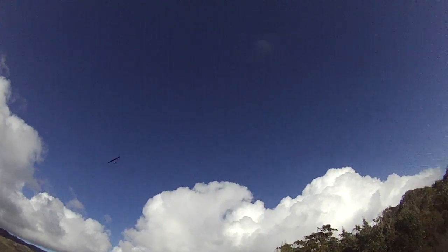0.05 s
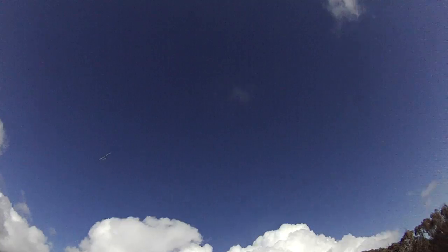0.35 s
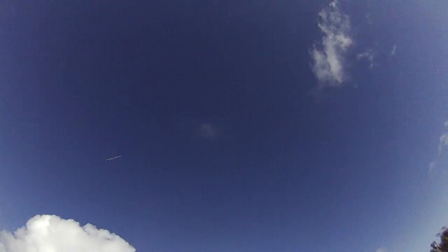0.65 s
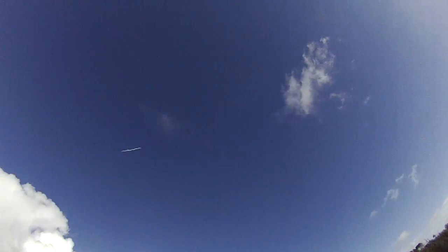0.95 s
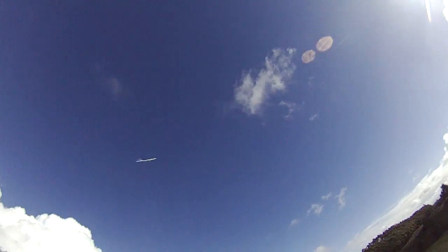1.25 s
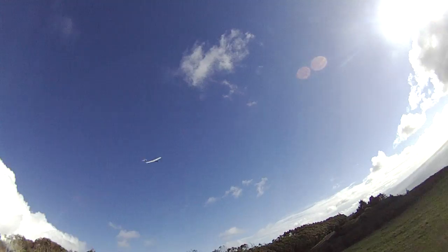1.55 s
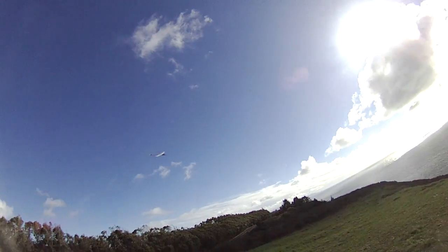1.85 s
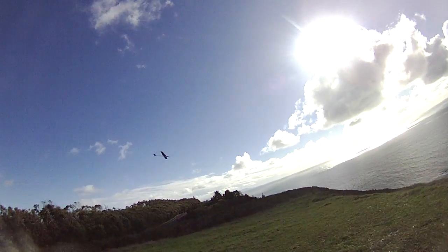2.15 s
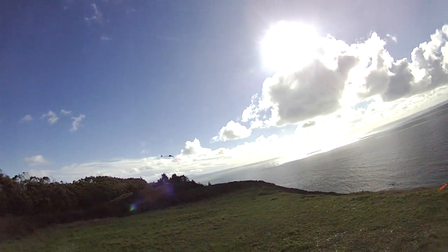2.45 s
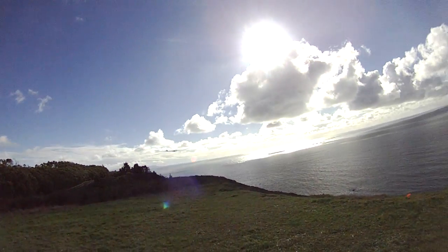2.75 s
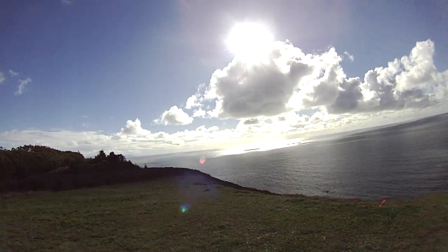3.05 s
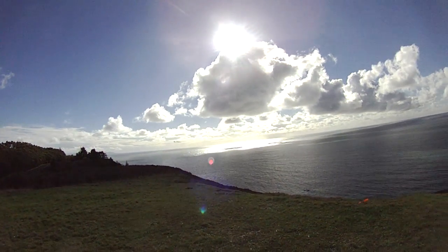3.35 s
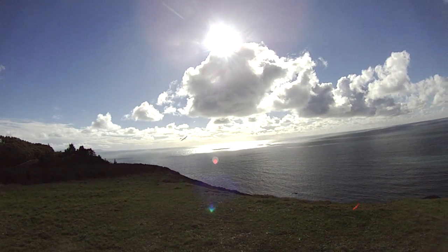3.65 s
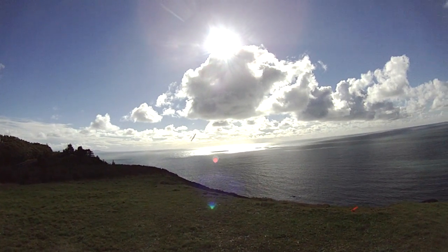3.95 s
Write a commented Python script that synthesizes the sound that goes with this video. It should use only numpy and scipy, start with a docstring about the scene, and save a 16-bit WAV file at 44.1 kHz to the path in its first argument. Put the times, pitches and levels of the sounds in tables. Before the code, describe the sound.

Strong wind buffets and roars on the microphone from the start, with a wavering whistle until about 0.7 seconds and hard gusts around 1 second. Near 1.7 seconds it drops to a gentle breeze, bumping softly over faint distant surf and thin grass hiss. A light tick comes near 2.9 seconds. The puffs pick up again around 3.8 seconds, where the sound cuts out for an instant.

```python
"""A grassy slope above the sea, a small microphone out in strong wind. Eddies buffet its port, and
the air rushes over the housing and whistles on an edge. The microphone turns out of the wind; then
soft eddies bump against it, over distant surf and a thin hiss and rustle of grass.
The housing ticks now and then, and near the end the sound drops out for an instant."""
import sys
import numpy as np
from scipy import signal
from scipy.fft import rfft, irfft
from scipy.io import wavfile
from scipy.ndimage import uniform_filter1d

SR = 44100
rng = np.random.default_rng(int(sys.argv[2]) if len(sys.argv) > 2 else 0)


def transcribe(u):
    """Save the signal u as a 16-bit wav file named by the first command-line argument.

    u: samples, shape (n,) or (channels, n), limited to [-1, 1]; the rate is SR.
    q: integer samples, one column per channel.
    """
    v = np.clip(np.atleast_2d(u).T, -1, 1)
    q = np.round(v * 32767).astype(np.int16)
    wavfile.write(sys.argv[1], SR, q)


N = 176400
TIME = np.arange(N) / SR
CALM_FROM_S, CALM_BY_S = 1.41, 1.717  # the microphone turns into its own lee

# Air on the microphone: buffeting at the port, roar across the housing, rasp off its corners,
# hiss in its slits: t/s, relative level/dB
BUFFET_LEVEL = [(0.0, -30.5), (0.03, -31.5), (0.1, -35.5), (0.12, -36), (0.2, -35.5), (0.23, -29),
                (0.36, -30.5), (0.4, -27), (0.57, -33), (0.59, -30.5), (1.04, -26.5), (1.28, -32.5),
                (1.36, -25), (1.39, -32), (1.54, -34.5), (1.56, -40.5), (1.67, -33), (1.73, -49),
                (1.78, -55), (1.82, -44), (1.87, -62), (2.41, -58.5), (2.44, -44.5), (2.53, -55),
                (2.55, -70), (2.71, -63.5), (2.84, -42.5), (2.87, -51.5), (2.95, -39.5), (3.0, -52),
                (3.06, -45.5), (3.13, -53.5), (3.21, -42.5), (3.26, -50), (3.41, -43.5), (3.42, -49),
                (3.73, -51), (3.77, -38.5), (3.82, -39.5), (3.88, -43.5), (4.0, -41.5)]
ROAR_LEVEL = [(0, -45), (.11, -41.5), (.18, -48), (.39, -38.5), (.6, -40), (.7, -37.5), (1.0, -35.5),
              (1.08, -38.5), (1.22, -40.5), (1.38, -38), (1.54, -40), (1.565, -51.5), (1.6, -51),
              (1.676, -42), (1.69, -66), (1.73, -62.5), (1.75, -58.5), (1.77, -97), (1.792, -45.5),
              (1.81, -104), (1.9, -68)]
RASP_LEVEL = [(0, -46.5), (.12, -44.5), (.18, -53.5), (.3, -52), (.4, -49.5), (.6, -53), (.75, -59.5),
              (.82, -41.5), (.87, -49.5), (1.02, -42.5), (1.07, -44), (1.12, -38.5), (1.17, -52.5),
              (1.33, -48), (1.43, -45), (1.5, -41.5), (1.54, -61), (1.57, -62), (1.675, -49), (1.69, -64),
              (1.85, -98)]
SLIT_HISS_LEVEL = [(.2, -89.5), (.95, -86), (1.08, -78.5), (1.125, -68.5), (1.16, -76.5), (1.23, -86),
                   (1.3, -77.5), (1.45, -88.5), (1.55, -98), (1.7, -100)]
# The surroundings: far surf, breeze in the grass, dry stems: t/s, level/dB
SURF_LEVEL = [(0, -65.5), (1.9, -62.5), (2.2, -58.5), (2.7, -58.5), (3.4, -57), (4, -57)]
GRASS_LEVEL = [(0, -76), (1.5, -80.5), (1.95, -79), (2.05, -77), (2.4, -74.5), (2.8, -73), (3.1, -74),
               (3.25, -71.5), (3.55, -72.5), (3.7, -68), (4, -70)]
STEM_LEVEL = [(3.1, -95), (3.24, -79), (3.45, -76.5), (3.56, -77), (3.7, -95)]
# Spectra of the noises at the microphone: f/Hz, relative density/dB
WINDWARD_SPECTRUM = [(25, -25.5), (60, -22), (110, -9.5), (170, -4), (260, 0), (380, 0), (600, -7),
                     (900, -21.5), (1500, -28.5), (3000, -73), (12000, -92.5)]
LEE_SPECTRUM = [(25, -9), (60, -4.5), (130, -2.5), (240, -2), (400, -9.5), (600, -15), (1000, -28),
                (2000, -36.5), (4000, -65), (12000, -83)]
ROAR_SPECTRUM = [(200, -15.5), (400, -3), (600, 5), (950, 0), (1500, -4.5), (2000, -14.5), (2550, -27),
                 (3100, -37.5), (3900, -44.5), (5200, -47), (7000, -55), (12000, -84.5)]
RASP_SPECTRUM = [(1000, -4), (1500, -2), (2000, 3), (2600, -9), (2900, -16.5), (3300, -25.5), (4200, -38),
                 (6000, -53), (12000, -81)]
SURF_SPECTRUM = [(30, 3), (120, -1), (250, 6), (400, -6), (700, 2), (1100, 0.5), (1550, -5.5),
                 (2000, -15.5), (2500, -29.5), (5000, -35.5)]
GRASS_SPECTRUM = [(1000, -1), (2200, -1), (3200, -0.5), (5000, -5), (7000, -10.5), (10000, -12),
                  (15000, -17)]
FLAP_SPECTRUM = [(100, -7), (300, 4.5), (700, 12), (1300, 4), (2100, -8.5), (2700, -10.5), (3300, -35.5),
                 (5000, -49), (12000, -94)]
RUSTLE_SPECTRUM = [(3000, -23), (5000, -1), (6400, 0), (7000, -10), (8000, 0), (9000, -20), (14000, -23)]
SNAP_SPECTRUM = [(1200, -25), (2000, -2), (3000, -1), (4300, -4), (6200, -4), (7500, -18), (13000, -30)]
# Likeness of left and right in the grass hiss: f/Hz, correlation/0-1
GRASS_CORRELATION = [(2000, 0.92), (4500, 0.8), (8000, 0.3), (13000, .75)]
# Single eddies on the port: t/s, peak level/dB, centre f/Hz
EDDIES = [(0.123, -18, 314), (.149, -19.5, 278), (.246, -15, 390), (0.972, -15.5, 422), (1.019, -17, 400),
          (1.046, -18, 520), (1.118, -19, 370), (1.502, -24, 420), (1.527, -24, 350), (1.674, -23, 330),
          (1.793, -54, 895), (1.818, -32.5, 243), (1.922, -47.5, 280), (1.979, -40.5, 159),
          (2.003, -45, 146), (2.188, -44.5, 320), (2.254, -45, 260), (2.361, -47.5, 240), (2.454, -43, 556),
          (2.461, -38, 264), (2.526, -38.5, 257), (2.836, -35.5, 534), (2.908, -31, 288), (2.923, -33, 430),
          (2.944, -37, 254), (2.955, -25, 257), (3.038, -36.5, 136), (3.063, -36, 167), (3.222, -38.5, 170),
          (3.397, -31.5, 220), (3.527, -36, 197), (3.768, -25, 253), (3.775, -38, 380), (3.8, -29, 258),
          (3.806, -28.5, 490), (3.819, -28.5, 260), (3.837, -33, 192), (3.854, -32.5, 230),
          (3.898, -35, 200), (3.917, -27.5, 427), (3.953, -30, 210), (3.981, -37, 180)]
# Edge tone of the housing, in two registers: t/s, f/Hz, relative level/dB
LOW_EDGE_TONE = [(.13, 1500, -48), (.19, 1520, -44), (.205, 1560, -33), (.218, 1600, -30.5),
                 (.229, 1440, -36), (.238, 1510, -34), (.25, 1470, -36), (.273, 1680, -31),
                 (.29, 1620, -60), (.303, 1630, -31), (.316, 1590, -31), (.328, 1390, -36),
                 (.343, 1530, -42), (.355, 1900, -29), (.369, 1650, -45), (.38, 1552, -35),
                 (.41, 1680, -39), (.44, 1440, -35), (.47, 1550, -33), (.495, 1560, -39), (.52, 1520, -35),
                 (.545, 1380, -42), (.585, 1290, -35.5), (.62, 1350, -48), (.645, 1460, -35),
                 (.662, 1550, -36), (.69, 1500, -60)]
HIGH_EDGE_TONE = [(.345, 2620, -73), (.362, 2446, -37), (.376, 2147, -50), (.392, 2340, -37),
                  (.406, 2610, -38.5), (.413, 2385, -36), (.429, 2170, -44), (.44, 2150, -67)]
# Instants when the flow tears loose: t/s, level/dB
FLAP_BURSTS = [(.145, -29.5), (0.82, -33.5), (1.199, -37), (1.372, -38), (1.498, -48), (1.531, -32.5),
               (1.544, -33), (1.586, -39), (1.611, -37), (1.663, -35), (1.677, -37.5), (1.705, -44.5),
               (1.751, -60), (3.77, -41.5), (3.805, -45), (3.926, -62), (3.97, -58), (3.987, -43)]
# Spits of the gusts and dry rustles in the lee: t/s, half-length/s, level/dB
SPIT_BURSTS = [(.818, .014, -68), (.97, .09, -75), (1.374, .008, -69), (1.495, .012, -71)]
RUSTLE_BURSTS = [(2.044, .035, -80), (2.213, 0.044, -81), (3.675, .04, -84), (3.744, 0.005, -65)]
# Resonances of the slits: f/Hz, width/Hz, relative level/dB
SLIT_RESONANCES = [(5220, 580, -2.5), (6170, 900, -4)]
# Light contacts on the housing: t/s, relative level/dB
CONTACTS = [(2.238, -62), (2.677, -56), (2.8755, -40), (2.8838, -45.5), (3.743, -58)]
# Modes of the housing: f/Hz, relative level/dB, T60/s
HOUSING_MODES = [(2030, -2.5, .022), (2400, -5.5, .011), (2900, -7, .009)]


def from_db(db):
    """Decibels to gain."""
    return 10 ** (np.asarray(db) / 20)


def unit_rms(x):
    """Scale to rms 1."""
    return x / np.sqrt(np.mean(x ** 2) + 1e-20)


def in_time(rows, column=1):
    """One column of a curve at every sample."""
    rows = np.array(rows)
    return np.interp(TIME, rows[:, 0], rows[:, column])


def per_bin(points):
    """Read a curve at every FFT bin, on a log-frequency axis."""
    points = np.array(points)
    hz = np.fft.rfftfreq(N, 1 / SR)
    return np.interp(np.log(hz + 1), np.log(points[:, 0]), points[:, 1])


def drift(rate_hz):
    """Smooth random wander with a spread near 1, its extremes rounded off."""
    step, settle = 10, 4000
    pole = np.exp(-2 * np.pi * rate_hz * step / SR)
    noise = rng.standard_normal(N // step + settle + 2)
    slow = unit_rms(signal.lfilter([1], [1, -2 * pole, pole * pole], noise)[settle:])
    wander = np.interp(np.arange(N) / step, np.arange(len(slow)), slow)
    return 2.5 * np.tanh(wander / 2.5)


def coloured(x, spectrum):
    """Give a signal a spectrum, rolled off below 20 Hz; rms 1."""
    hz = np.fft.rfftfreq(N, 1 / SR)
    gain = from_db(per_bin(spectrum)) * hz / np.hypot(hz, 20)
    return unit_rms(irfft(rfft(x) * gain, N))


def resonant(x, hz, width_hz):
    """Pass twice through a two-pole band-pass; rms 1."""
    r = np.exp(-np.pi * width_hz / SR)
    b, a = [1 - r, 0, r - 1], [1, -2 * r * np.cos(2 * np.pi * hz / SR), r * r]
    return unit_rms(signal.lfilter(b, a, signal.lfilter(b, a, x)))


def swells(rows):
    """An envelope of bell-shaped bursts."""
    return sum(from_db(db) * np.exp(-np.minimum(((TIME - s) / half_s) ** 2, 20))
               for s, half_s, db in rows)


def decay(age, t60):
    """Fall by 60 dB every t60 seconds."""
    return np.exp(-np.log(1000) * np.minimum(age / t60, 10))


def turbulence(spectrum, lump_db, rate_hz, flicker_db):
    """Noise in lumps shared by all pitches, while each octave also flickers by itself."""
    lumps, bands = lump_db * drift(rate_hz), 0
    edges = np.geomspace(20, 16000, 11)
    for low, high in zip(edges, edges[1:]):
        octave = signal.butter(2, [low, high], "band", fs=SR, output="sos")
        band = signal.sosfilt(octave, rng.standard_normal(N))
        bands += band * from_db(lumps + flicker_db * drift(rate_hz))
    noise = coloured(bands, spectrum)
    return noise / np.sqrt(uniform_filter1d(noise ** 2, size=1700) + 1e-9)  # even out slow swings


def buffeting():
    """Eddies right on the port: throaty in the full wind, deeper and patchier in the lee."""
    calm = np.clip((TIME - CALM_FROM_S) / (CALM_BY_S - CALM_FROM_S), 0, 1)
    windward = from_db(-1) * turbulence(WINDWARD_SPECTRUM, lump_db=2.5, rate_hz=56, flicker_db=1.6)
    lee = from_db(-0.5) * turbulence(LEE_SPECTRUM, lump_db=2.7, rate_hz=50, flicker_db=2.4)
    return from_db(in_time(BUFFET_LEVEL)) * (np.sqrt(1 - calm) * windward + np.sqrt(calm) * lee)


def rush():
    """Fast air tears across the housing with a fluttering roar and a crackly rasp."""
    roar = from_db(4) * turbulence(ROAR_SPECTRUM, lump_db=3.0, rate_hz=35, flicker_db=-0.7)
    rasp = turbulence(RASP_SPECTRUM, lump_db=3.0, rate_hz=120, flicker_db=4.5)
    fade = np.clip((1.92 - TIME) / .06, 0, 1)
    return fade * (from_db(in_time(ROAR_LEVEL)) * roar + from_db(in_time(RASP_LEVEL)) * rasp)


def surf():
    """The sea, far off below the slope: a smooth, dull wash."""
    return from_db(in_time(SURF_LEVEL)) * coloured(rng.standard_normal(N), SURF_SPECTRUM)


def grass():
    """The breeze hisses thinly in the grass, the only sound with stereo width."""
    mid, side = rng.standard_normal((2, N))
    alike = per_bin(GRASS_CORRELATION)
    side = irfft(rfft(side) * np.sqrt((1 - alike) / (1 + alike)), N)
    hiss = coloured(np.array([mid + side, mid - side]), GRASS_SPECTRUM)
    return from_db(in_time(GRASS_LEVEL) + 1.3 * drift(7.2)) * hiss


def thumps():
    """Each eddy on the port is one dip of pressure between two smaller swells."""
    out = np.zeros(N)
    for s, db, hz in EDDIES:
        u = (np.pi * hz * (TIME - s)) ** 2
        out += from_db(db) * (2 * u - 1) * np.exp(-np.minimum(u, 50))
    return out


def whistle(curve, waver, rough_db):
    """An edge tone on the housing; its pitch and strength shake with the turbulence."""
    hz = in_time(curve, column=1) * (1 + waver * drift(420))
    gain = from_db(in_time(curve, column=2) + rough_db * drift(330))
    sounding = (TIME > curve[0][0]) & (TIME < curve[-1][0])
    return sounding * gain * np.sin(2 * np.pi * np.cumsum(hz) / SR)


def flaps(half_s=0.0041):
    """The flow tears loose for an instant in short, harsh bursts."""
    bursts = swells((s, half_s, db) for s, db in FLAP_BURSTS)
    return bursts * coloured(rng.standard_normal(N), FLAP_SPECTRUM)


def spits():
    """The sharpest gusts spit a short, bright hiss off the housing's corners."""
    return swells(SPIT_BURSTS) * resonant(rng.standard_normal(N), hz=4000, width_hz=1400)


def slits():
    """The hardest gusts hiss thinly through the housing's slits, in narrow bands near 5.2 and 6.2 kHz."""
    hiss = sum(from_db(db) * resonant(rng.standard_normal(N), hz, width)
               for hz, width, db in SLIT_RESONANCES)
    return hiss * from_db(in_time(SLIT_HISS_LEVEL) + 0.7 * drift(50)) * (TIME < CALM_BY_S)


def rustles():
    """Soft, high brushing, heard once the microphone is in the lee."""
    return swells(RUSTLE_BURSTS) * coloured(rng.standard_normal(N), RUSTLE_SPECTRUM)


def ticks(rise_s=.0004):
    """Light contacts on the microphone make a dull snap and ring its plastic housing."""
    out = np.zeros(N)
    snap = from_db(-9) * coloured(rng.standard_normal(N), SNAP_SPECTRUM)
    for s, db in CONTACTS:
        age = np.maximum(TIME - s, 0)
        tick = snap * decay(age, t60=.011)
        for k, (hz, mode_db, t60) in enumerate(HOUSING_MODES):
            tick += (-1) ** k * from_db(mode_db) * decay(age, t60) * np.sin(2 * np.pi * hz * age)
        out += from_db(db) * np.minimum(age / rise_s, 1) * tick
    return out


def stems():
    """Dry stems brush together as the breeze picks up: a soft, grainy rustle."""
    grains = rng.standard_normal(N) * from_db(3 * drift(120))
    return from_db(in_time(STEM_LEVEL)) * resonant(grains, hz=3100, width_hz=1100)


def scene():
    """Wind on the microphone and distant surf sit in the centre; the grass spreads a little."""
    whistles = whistle(LOW_EDGE_TONE, waver=.032, rough_db=3.0)
    whistles += whistle(HIGH_EDGE_TONE, waver=.016, rough_db=2.4)
    wind = buffeting() + rush() + thumps() + from_db(-1.3) * whistles + flaps() + spits() + slits()
    return wind + ticks() + rustles() + stems() + surf() + grass()


def record(dry):
    """The microphone's signal drops out for an instant, and the top treble is cut."""
    dropout_from_s, dropout_to_s, cutoff_hz = 3.788, 3.799, 15200
    live = (TIME < dropout_from_s) | (TIME > dropout_to_s)
    gate = uniform_filter1d(1.0 * live, size=60)
    lowpass = signal.ellip(10, .1, 80, cutoff_hz, fs=SR, output="sos")
    return signal.sosfilt(lowpass, dry * gate)


dry = scene()
out = record(dry)
transcribe(out)
```